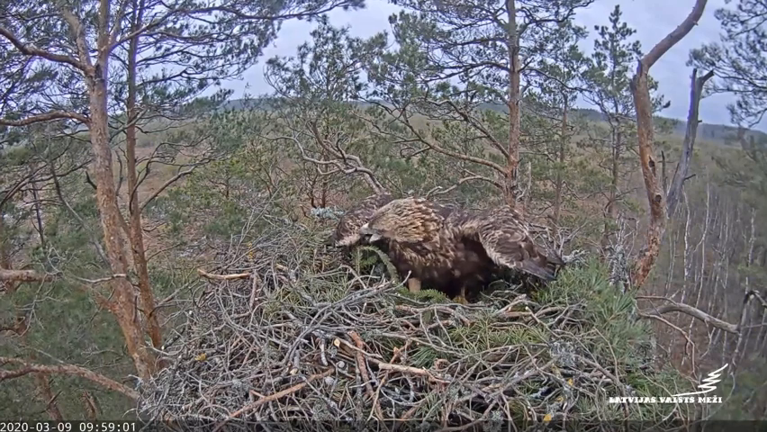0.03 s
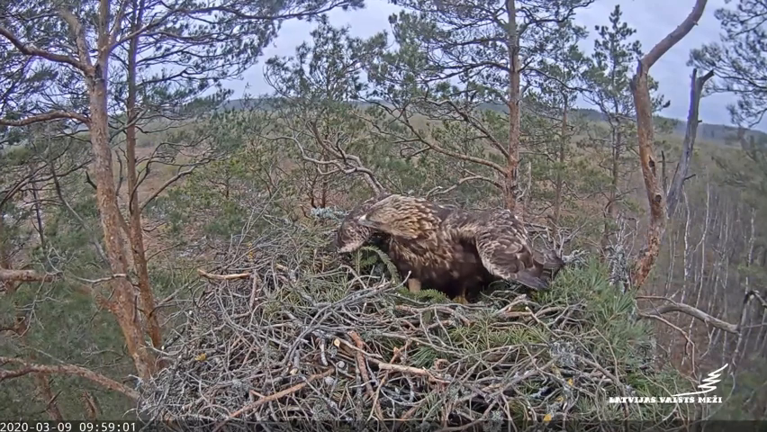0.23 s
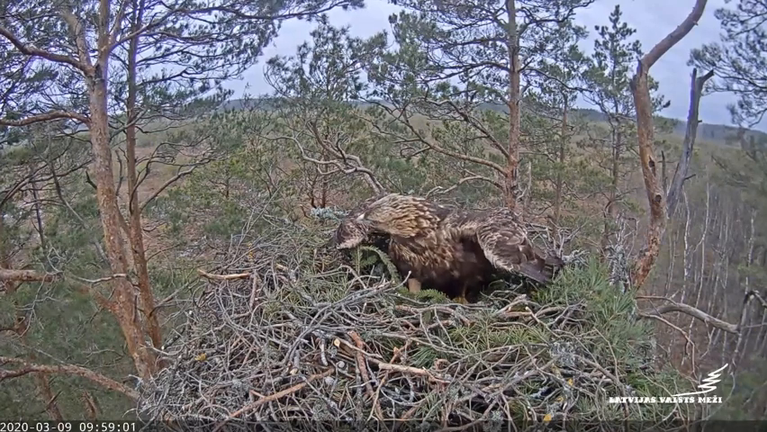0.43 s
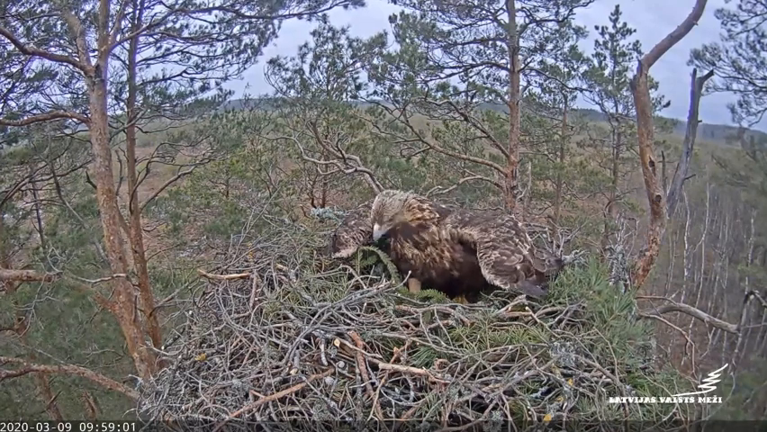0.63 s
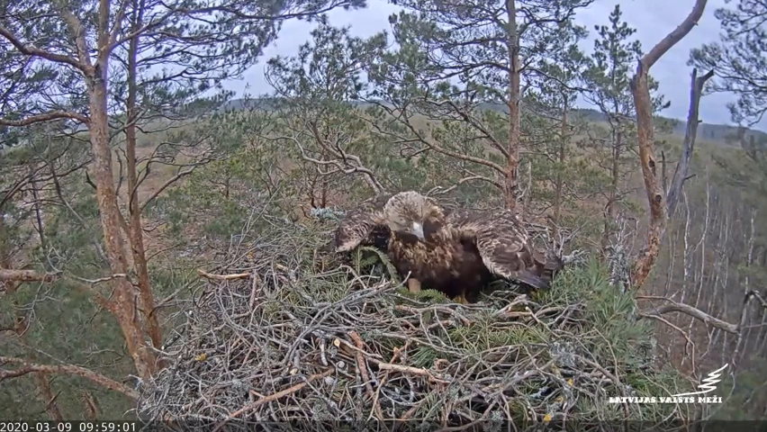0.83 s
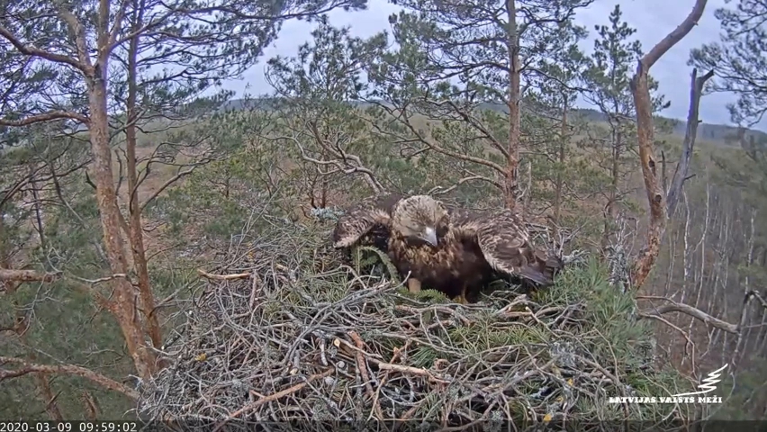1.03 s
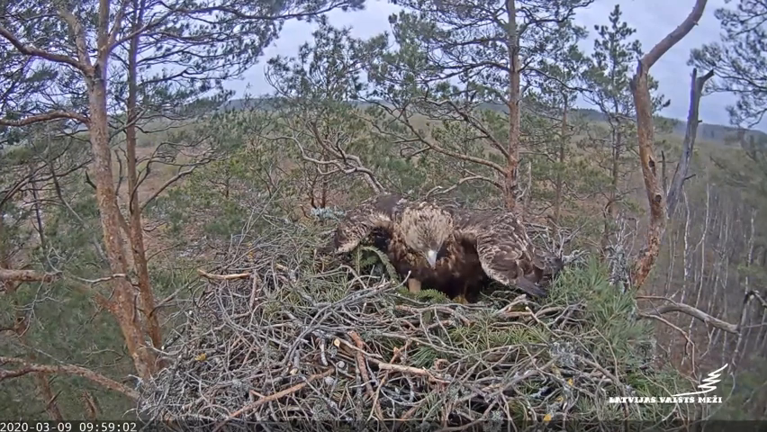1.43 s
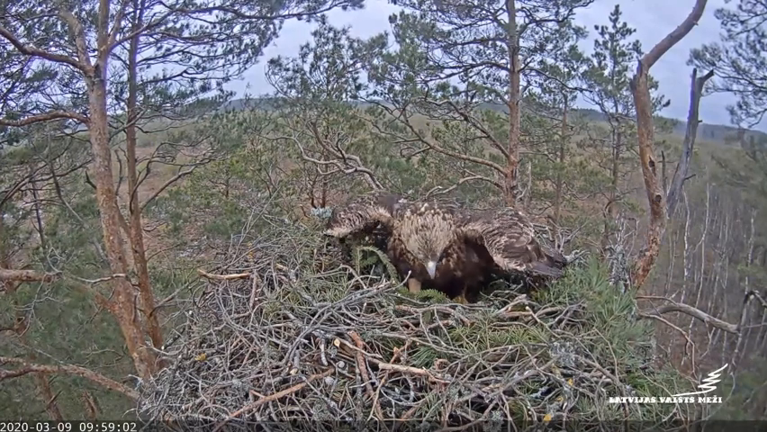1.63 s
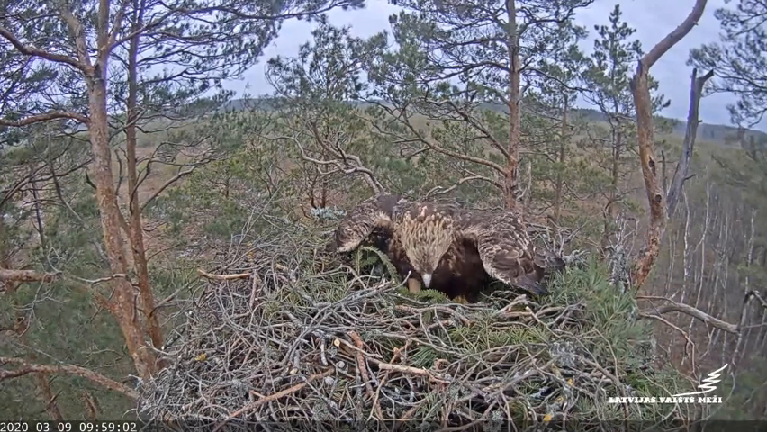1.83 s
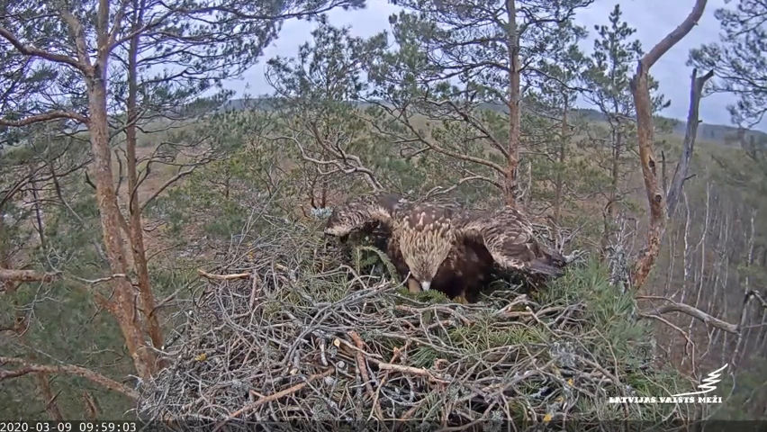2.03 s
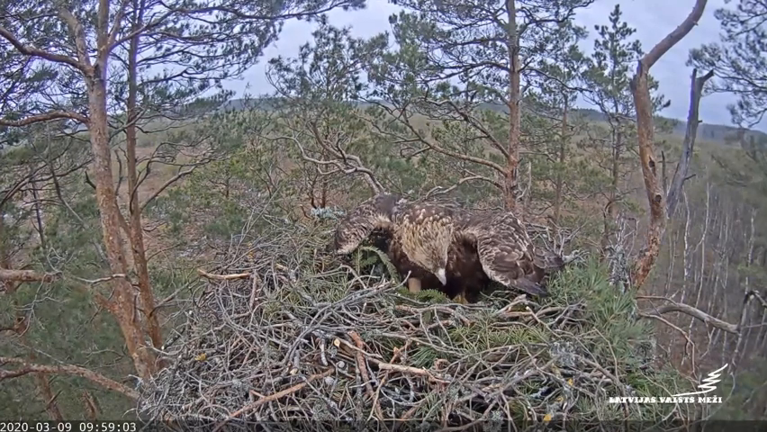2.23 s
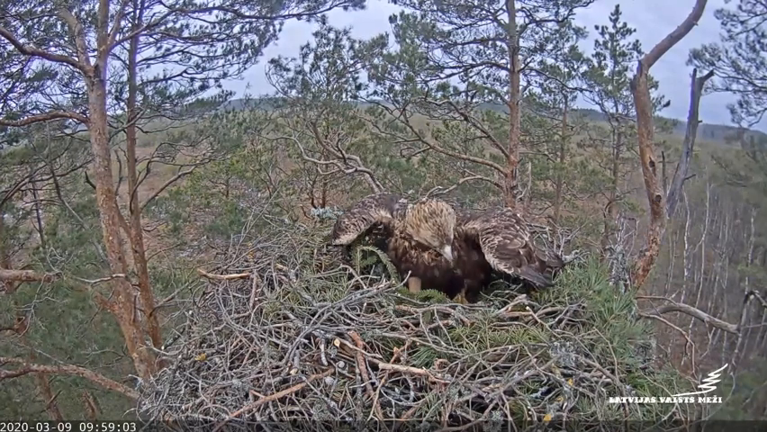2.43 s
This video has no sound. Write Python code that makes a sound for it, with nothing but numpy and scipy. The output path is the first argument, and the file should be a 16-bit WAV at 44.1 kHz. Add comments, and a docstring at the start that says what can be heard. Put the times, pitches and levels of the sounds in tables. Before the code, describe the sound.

Two sharp, slightly distorted eagle yelps, each led by a thin rising whistle, echo through trees.

```python
"""An eagle on its nest yelps twice, so close that the microphone overloads on each yelp.
A thin rising whistle turns to a wheeze in its throat and leads into each yelp, a loud tone
that holds, cracks upward and falls away. Trunks and forest echo the calls, and a soft cluck
follows. Wind rumbles underneath, with a faint hiss."""
import sys
import numpy as np
from scipy import signal
from scipy.fft import rfft, irfft, next_fast_len
from scipy.io import wavfile
from scipy.ndimage import map_coordinates

SR = 44100
rng = np.random.default_rng(int(sys.argv[2]) if len(sys.argv) > 2 else 0)


def persist_wave(psi):
    """Save psi, clipped to +-1, as 16-bit WAV."""
    counts = np.round(np.clip(psi, -1, 1) * 32767).astype(np.int16)
    wavfile.write(sys.argv[1], SR, np.atleast_2d(counts).T)


N = 110250
T = np.arange(N) / SR


def amp(db):
    """Turn decibels into a gain to multiply by."""
    return 10 ** (np.asarray(db) / 20)


def along(points, hz):
    """Read between (f/Hz, value) points on a log frequency scale."""
    f, values = np.transpose(points)
    return np.interp(np.log(hz + 1), np.log(f + 1), values)


def filtered(x, response):
    """Scale each frequency in x by the gain response(hz)."""
    size = next_fast_len(N + SR // 2)
    return irfft(rfft(x, size) * response(np.fft.rfftfreq(size, 1 / SR)), size)[:N]


def coloured(x, colour):
    """Turn frequencies up or down by a table of (f/Hz, level/dB)."""
    return filtered(x, lambda hz: amp(along(colour, hz)))


def noise(colour):
    """Noise with the given colour, scaled to a typical size (rms) of 1."""
    x = coloured(rng.standard_normal(N), colour)
    return x / x.std()


def wobble(rate):
    """A smooth curve through `rate` random values a second."""
    return map_coordinates(rng.standard_normal(N // 8), [T * rate], mode="wrap")


def pitch_and_gain(rows):
    """Glide through (t/s, f/Hz, level/dB) rows, silent before and after."""
    times, hz, db = np.transpose(rows)
    times = np.sort(times)
    return np.interp(T, times, hz), amp(np.interp(T, times, db, left=-120, right=-120))


def voice(hz, harmonics):
    """Add up harmonics: pure tones at whole multiples of a moving pitch."""
    phase = 2 * np.pi * np.cumsum(hz) / SR
    return sum(amp(db) * np.sin(multiple * phase) for multiple, db in harmonics)


# Colour of the hiss and of the wind's rumble: f/Hz, level/dB
HISS_COLOUR = [(59, -12), (100, -7.5), (185, -3.5), (257, -3), (396, -4), (1250, -16), (1630, -16),
               (2090, -10), (2310, -16), (3020, -21.5), (13500, -26.5)]
RUMBLE_COLOUR = [(3, -5.5), (10, -7), (25, -7), (50, -24), (100, -26), (200, -36.5), (500, -79.5)]
# How the wind swells and drops: t/s, level/dB
WIND_LEVELS = [(0, -29), (.5, -36.5), (1.1, -31.5), (1.4, -35.5), (1.62, -28.5), (1.76, -35), (1.92, -28.5),
               (2.1, -30.5), (2.5, -33.5)]
def wind_and_hiss():
    """Wind rumbles in uneven gusts under a steady hiss."""
    hiss = filtered(noise(HISS_COLOUR), lambda hz: hz < 14000)
    wind_db = np.interp(T, *np.transpose(WIND_LEVELS)) - wobble(4.5)
    return amp(-47.5) * hiss + amp(wind_db) * noise(RUMBLE_COLOUR)


# The path of each whistle's second harmonic: t/s, f/Hz, level/dB
WHISTLES = [
    [(0, 3660, -34.5), (.03, 3880, -39.5), (.055, 4250, -25.5), (.078, 4580, -37), (.097, 5000, -31.5),
     (.115, 5776, -44), (.135, 5200, -40)],
    [(.962, 3020, -67.5), (.975, 3130, -45), (1.005, 3400, -35.5), (1.045, 3470, -47), (1.07, 3620, -33.5),
     (1.118, 3950, -45.5), (1.147, 4500, -27), (1.175, 4720, -47.5), (1.20, 4950, -35.5),
     (1.225, 5300, -65)],
]
# How much each whistle wavers, as a fraction of its pitch
WHISTLE_WAVER = [.018, .007]
# The tones in a whistle: multiple of the pitch, level/dB
WHISTLE_HARMONICS = [(1, -15), (2, 3), (3, -28), (4, -22.5)]
# The whistle's colour: f/Hz, level/dB
WHISTLE_COLOUR = [(1500, -8.5), (2000, 1), (2400, -6), (3300, -3), (5800, 1), (6600, -4), (7700, 1),
                  (8600, -14), (11000, -29.5)]
def whistle(rows, waver):
    """A thin rising note whose second harmonic is the loudest."""
    hz, gain = pitch_and_gain(rows)
    pitch = hz / 2 * (1 + waver * wobble(500))
    tone = voice(pitch, WHISTLE_HARMONICS)
    flutter = amp(1.5 * wobble(170))
    return coloured(gain * flutter * tone, WHISTLE_COLOUR)


# The wheeze before each yelp: start t/s, end t/s, level/dB
WHEEZES = [(.096, 0.16, -37.5), (1.192, 1.252, -36.5)]
# The wheeze's colour: f/Hz, level/dB
WHEEZE_COLOUR = [(900, -33.5), (1600, -17), (2300, -13.5), (2850, -5), (3400, -14.5), (4300, -10),
                 (5200, 2), (5900, 4.5), (6500, -10.5), (7200, -23.5), (14000, -30.5)]
def wheezes(rise_s=.012, creep_s=.09, fall_s=.011):
    """Hiss in the bird's throat grows under the whistle and takes over."""
    gain = 0
    for start, end, db in WHEEZES:
        time_left = np.maximum(start - T, 0)
        rise = np.exp(-time_left / rise_s) + amp(-19.5) * np.exp(-time_left / creep_s)
        fall = np.exp(-np.maximum(T - end, 0) / fall_s)
        gain = gain + amp(db) * rise * fall
    return gain * noise(WHEEZE_COLOUR)


# The path of each yelp: t/s, f/Hz, level/dB
YELPS = [
    [(.130, 2049, -33), (.136, 2023, -8), (.145, 2055, 3), (.157, 2094, 4), (.170, 2101, 3.5),
     (.175, 2324, 3.5), (.189, 2347, 4), (.193, 2300, -14.5), (.203, 1805, -19), (.211, 1820, -13.5),
     (.226, 1737, -9.5), (.233, 1807, -23.5)],
    [(1.242, 2011, -41.5), (1.247, 2110, -3), (1.251, 2054, 10), (1.265, 2122, 5), (1.276, 2139, 13.5),
     (1.281, 2164, -15.5), (1.290, 2258, -4.5), (1.296, 2067, 1.5), (1.305, 1948, 5), (1.319, 1785, 4.5),
     (1.324, 1760, -14.5)],
]
# The tones above the main one: multiple of the pitch, level/dB
YELP_OVERTONES = [(2, 0), (3, -9.5), (4, -17.5)]
# How the throat colours those tones, and the colour of the rasp: f/Hz, level/dB
THROAT_COLOUR = [(2600, -13), (3400, -15.5), (3950, -3), (4240, 4), (4480, -8), (4720, -8), (5400, -7),
                 (6350, -3.5), (7000, -18), (8400, -9.5), (9500, -20.5)]
RASP_COLOUR = [(900, -42.5), (1500, -15), (2100, 6), (2600, 2), (3200, -15.5), (4500, -7.5), (5500, -9.5),
               (6400, -12.5), (8000, -22), (15000, -34)]
# The mix in each yelp: overtone level/dB, rasp level/dB
YELP_MIXES = [(-22.5, -29), (-29, -32)]
def yelp(rows, overtone_db, rasp_db):
    """A loud tone with a little rasp; the throat picks out its second harmonic."""
    hz, gain = pitch_and_gain(rows)
    pitch = hz * (1 + .004 * wobble(500))
    overtones = coloured(voice(pitch, YELP_OVERTONES), THROAT_COLOUR)
    tone = voice(pitch, [(1, .0096)]) + amp(overtone_db) * overtones
    flutter = amp(.5 * wobble(300))
    return gain * flutter * (tone + amp(rasp_db) * noise(RASP_COLOUR))


# The catch at the start of each yelp: t/s, f/Hz, level/dB
CATCHES = [(.133, 2554, -16.5), (1.2445, 2630, -9.5)]
def voice_catches(width_s=.0015):
    """A brief higher chirp as the voice takes hold."""
    chirps = 0
    for middle, hz, db in CATCHES:
        swell = np.exp(-.5 * ((T - middle) / width_s) ** 2)
        chirps = chirps + amp(db) * swell * np.sin(2 * np.pi * hz * (T - middle))
    return chirps


# The break at the end of each yelp: start t/s, length/s, starting f/Hz, level/dB
BREAKS = [(0.198, 0.026, 1619, -8.5), (1.319, 0.016, 1487, -9.5)]
def voice_break(start, length, hz, db, fall_hz_per_s=13000):
    """The voice breaks to a short, lower note that slides down."""
    age = np.clip(T - start, 0, length)
    pitch = (hz - fall_hz_per_s * age) * (1 + .012 * wobble(500))
    swell = np.sin(np.pi * age / length)
    return amp(db) * swell * voice(pitch, [(1, .023), (2, -20)])


# Single echoes from nest and trunks: delay t/s, level/dB
ECHOES = [(.0105, -15), (.0235, -18.5), (.034, -19.5), (.105, -25)]
# How long the far forest rings: f/Hz, t/s to fade by 60 dB
FOREST_FADE = [(200, .6), (1300, 1.3), (2100, 1.13), (3200, 2), (4200, .8), (6400, 1.8), (12000, 0.38)]
# The colour of all the echoes: f/Hz, level/dB
ECHO_COLOUR = [(600, -2.5), (1400, -4), (1780, -2.5), (2100, 3.5), (3200, -0.5), (4220, 8), (5300, 4.5),
               (6400, 8), (8500, 4.5)]
# How strongly the forest answers each yelp: level/dB
YELP_ECHO_DB = [1, -1.5]
def forest(x, near_fade_s=.89, build_s=.013):
    """Sound bounces off trunks, scatters in nearby treetops and lingers far away."""
    hz, t, (far_noise, near_noise) = signal.stft(rng.standard_normal((2, 2 * SR)), SR, nperseg=256)
    far_fade_s = along(FOREST_FADE, hz)[:, None]
    far = signal.istft(far_noise * amp(-60 * t / far_fade_s), SR, nperseg=256)[1]
    near = signal.istft(near_noise * amp(-60 * t / near_fade_s), SR, nperseg=256)[1]
    tail = amp(-24.5) * far / np.linalg.norm(far) + amp(-19.5) * near / np.linalg.norm(near)
    tail *= 1 - np.exp(-np.arange(len(tail)) / SR / build_s)
    for delay, db in ECHOES:
        tail[round(delay * SR)] += amp(db)
    return coloured(signal.fftconvolve(x, tail)[:N], ECHO_COLOUR)


# The path of the cluck: t/s, f/Hz, level/dB
CLUCK = [(2.28, 690, -53), (2.29, 669, -31), (2.305, 614, -33), (2.322, 545, -35), (2.342, 500, -56)]
# The tones in it: multiple of the pitch, level/dB
CLUCK_HARMONICS = [(1, -5), (2, -16.5), (3, -15), (4, -23.5)]
# The colour of the beak's tick: f/Hz, level/dB
BEAK_COLOUR = [(100, -15), (350, 6.5), (900, -10.5), (2200, -15.5), (5000, -40.5), (14000, -56)]
def cluck(tick_at_s=2.265, tick_fade_s=.1):
    """A dull tick of the beak, then a short, low, falling note."""
    tick_db = -37.5 - 60 * np.abs(T - tick_at_s) / tick_fade_s
    tick = (T > tick_at_s) * amp(tick_db) * noise(BEAK_COLOUR)
    hz, gain = pitch_and_gain(CLUCK)
    pitch = hz * (1 + .01 * wobble(500))
    return tick + gain * voice(pitch, CLUCK_HARMONICS)


def scene():
    """The eagle's soft sounds and loud yelps, each with its echo, over the wind."""
    whistles = sum(whistle(rows, waver) for rows, waver in zip(WHISTLES, WHISTLE_WAVER))
    soft = whistles + wheezes() + voice_catches() + cluck()
    sound = soft + forest(soft) + wind_and_hiss()
    for rows, mix, drop, echo_db in zip(YELPS, YELP_MIXES, BREAKS, YELP_ECHO_DB):
        call = yelp(rows, *mix) + voice_break(*drop)
        sound = sound + call + amp(echo_db) * forest(call)
    return sound[None]


# The microphone's colour: f/Hz, level/dB
MIC_COLOUR = [(5000, 0), (10000, 0.5), (13000, 2.5), (14500, -5.5), (15700, -13.5)]
def record(dry, input_sr=32000, ceiling=.89, hardness=8, top_hz=15750):
    """Overload flattens the peaks; new overtones too high for the input's sample rate fold back down."""
    x = signal.resample(dry[0], round(N * input_sr / SR))
    flattened = x / (1 + np.abs(x / ceiling) ** hardness) ** (1 / hardness)
    restored = signal.resample(flattened, N)  # back to SR
    return filtered(restored, lambda hz: amp(along(MIC_COLOUR, hz)) * (hz < top_hz))[None]


dry = scene()
out = record(dry)
persist_wave(out)
```